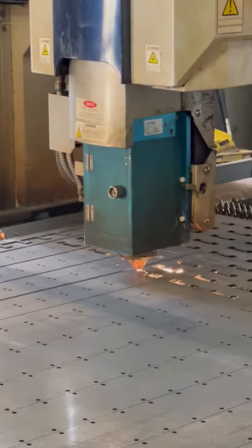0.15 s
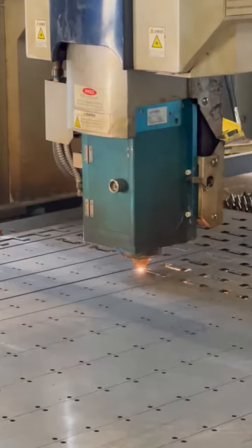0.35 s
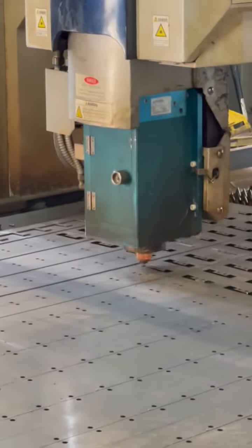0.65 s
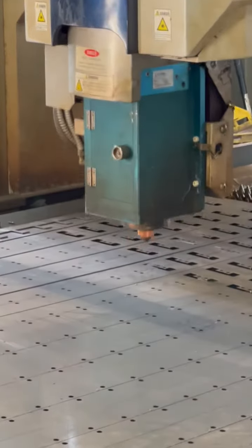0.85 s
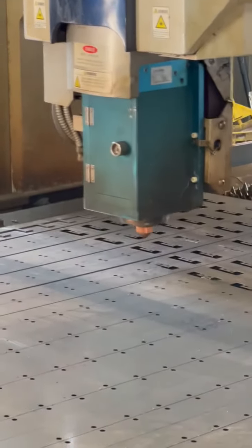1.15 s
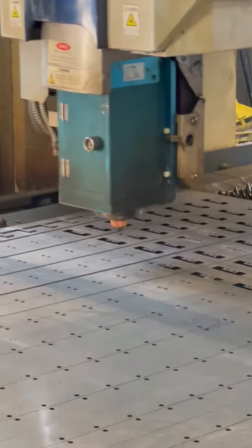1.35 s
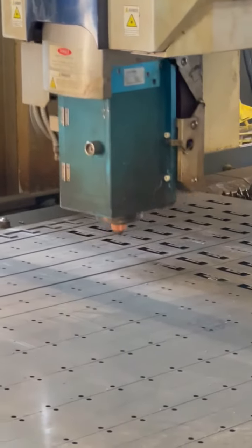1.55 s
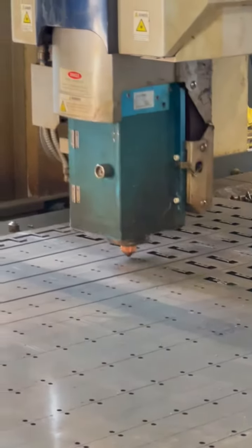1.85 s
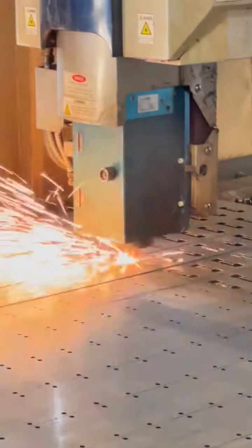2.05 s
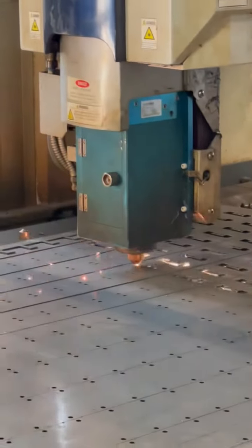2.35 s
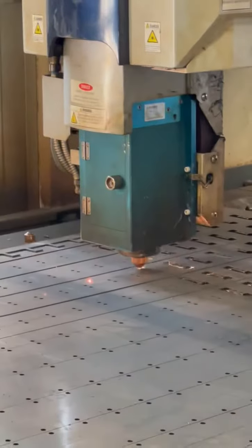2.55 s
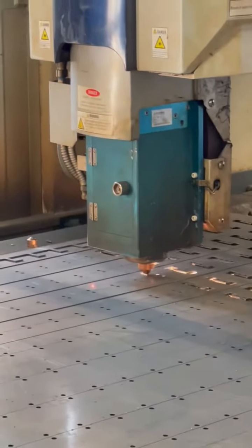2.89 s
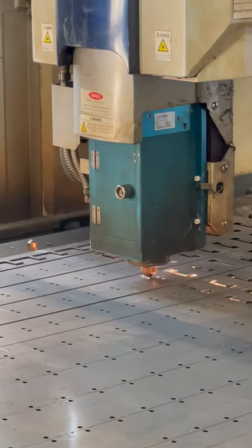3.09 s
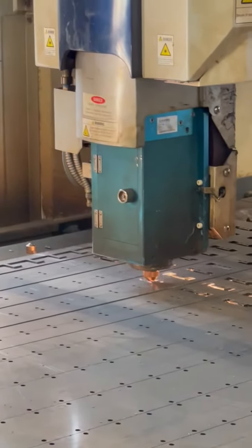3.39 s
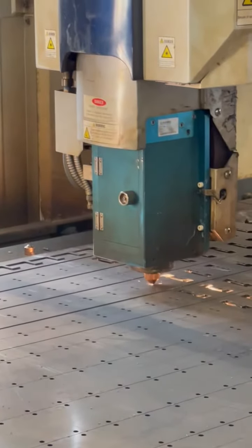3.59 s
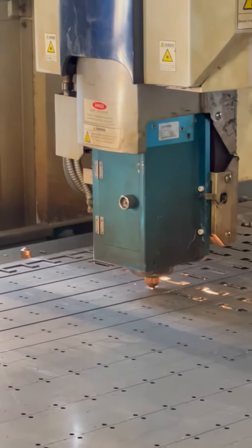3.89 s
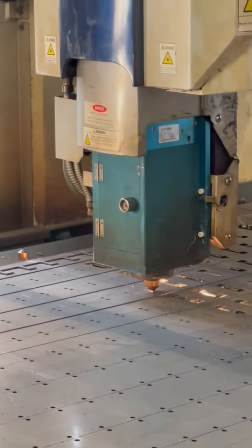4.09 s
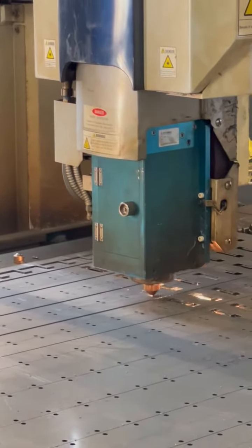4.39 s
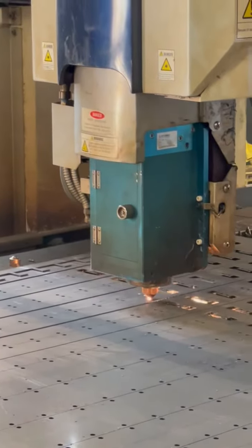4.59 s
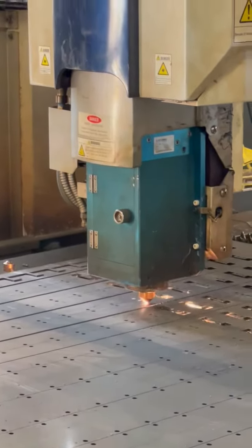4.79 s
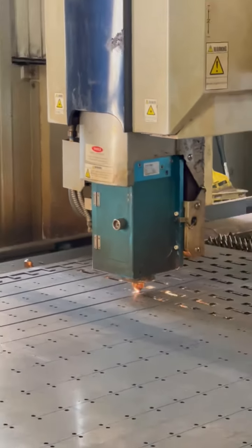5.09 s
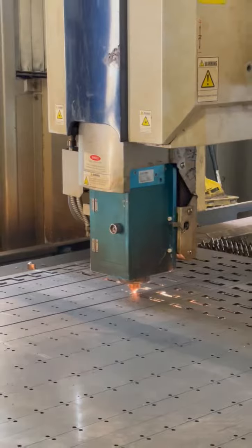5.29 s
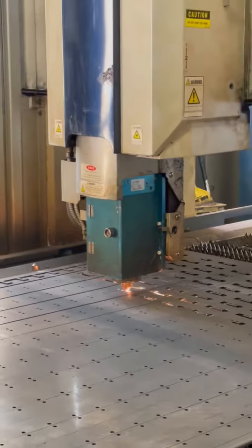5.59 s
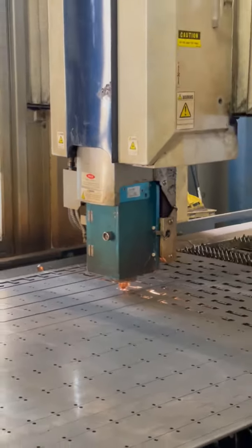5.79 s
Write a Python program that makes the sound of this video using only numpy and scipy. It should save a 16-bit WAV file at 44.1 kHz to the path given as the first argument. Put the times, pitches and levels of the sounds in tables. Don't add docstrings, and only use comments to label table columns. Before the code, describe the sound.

A laser head cuts sheet steel: thin treble hiss over a heavy low machine drone. The hiss stops early with small spits, returns in short puffs, then snaps back in a crackling pierce near two seconds. A streaky whistle joins the cut until a hard compressed-air blast past the middle; afterwards the hiss continues, faltering slightly. Phone microphone close to the machine in a big hall.

```python
import sys
import numpy as np
from scipy import signal
from scipy.io import wavfile
from scipy.ndimage import uniform_filter1d, minimum_filter1d

SR = 44100
rng = np.random.default_rng(int(sys.argv[2]) if len(sys.argv) > 2 else 0)


def gain_from_db(level_db):
    decades = np.asarray(level_db, float) / 20
    return 10 ** decades


def waveform_to_disk(signal):
    frames = np.transpose(np.atleast_2d(signal))
    scaled = np.clip(frames, -1, 1) * 32767
    samples = np.round(scaled).astype(np.int16)
    wavfile.write(sys.argv[1], SR, samples)


N = 261954
TIME_S = np.arange(N) / SR


def evened(x):
    return x / np.sqrt(np.mean(x ** 2) + 1e-20)


def read(points, hz):
    table_hz, value = np.transpose(points)
    return np.interp(np.log(hz + 1), np.log(table_hz + 1), value)


def wander(rate_hz, t):
    rates = np.geomspace(rate_hz / 20, rate_hz, 24)
    return evened(sum(np.sin(2 * np.pi * (f * t + rng.random())) / np.sqrt(f) for f in rates))


def gate(on, off, rise, fall):
    return np.clip((TIME_S - on) / rise, 0, 1) * np.clip(1 - (TIME_S - off) / fall, 0, 1)


def beat(db, loudest_s, period_s, share):
    return gain_from_db(db) * abs(1 + share * np.exp(2j * np.pi * (TIME_S - loudest_s) / period_s))


# pitch_hz, likeness (0-1), left_lead (turns), left_over_right_db
PORT_PAIR = [(115, 1, 0, 0), (140, .995, 0, .9), (330, .95, 0, 1.2), (550, .82, -.02, 3.4),
             (800, .68, -.03, 2.6), (1200, .62, -.03, 2.4), (1650, .7, -.04, 2), (2150, .985, 0, 0),
             (3900, .975, .01, 0), (4500, .93, .08, 0), (4900, .8, .27, 0), (5050, .5, .1, 0),
             (5200, .995, 0, 0), (6000, .99, .02, 0), (6400, .85, .14, 0), (7500, .75, .28, 0),
             (8300, .87, .42, 0), (8800, .96, .47, 0), (9400, .993, .5, 0), (11300, .985, .505, 0),
             (12100, .9, .58, 0), (13300, .7, .83, 0), (14000, .93, .96, 0), (14700, .995, 1, 0)]


def ports(hz):
    table_hz, likeness, lead, tilt_db = np.transpose(PORT_PAIR)
    left = gain_from_db(np.interp(hz, table_hz, tilt_db) / 2) * np.exp(1j * np.pi * np.interp(hz, table_hz, lead))
    return np.interp(hz, table_hz, likeness), np.array([left, 1 / left])


def noise(shape_db, size, patchy_db, flicker_db, patch_hz=450, patch_s=0.045):
    hop = size // 4
    hz = np.fft.rfftfreq(size, 1 / SR)
    t = np.arange(N // hop + 5) * hop / SR
    a, b, c, d, patches = rng.standard_normal((len(t), len(hz), 5)).T
    patches = uniform_filter1d(patches, int(patch_hz / hz[1]) + 1, axis=0)
    patches = uniform_filter1d(patches, int(patch_s / t[1]) + 1, axis=1)
    likeness, gain = ports(hz)
    common = np.sqrt(1 + likeness)[:, None] * (a + 1j * b)
    apart = np.sqrt(1 - likeness)[:, None] * (c + 1j * d)
    level = gain_from_db(shape_db(hz[:, None], t) + patchy_db * evened(patches) + flicker_db * wander(40, t))
    apart = apart * gain_from_db(3.6 * evened(patches[:, ::-1]) - 1.3)
    bins = np.array([common + apart, common - apart]) * gain[:, :, None] * level
    return signal.istft(bins, nperseg=size, noverlap=size - hop)[1][:, :N]


def tones(lines, drift, waver_db):
    coarse_s = np.arange(0, N, 100) / SR
    out = np.zeros((2, N))
    for hz, db in lines:
        slip = np.interp(TIME_S, coarse_s, wander(8, coarse_s))
        swell = np.interp(TIME_S, coarse_s, wander(8, coarse_s))
        turns = np.cumsum(hz * (1 + drift * slip)) / SR + rng.random()
        at_ports = ports(hz)[1][:, None] * np.exp(2j * np.pi * turns)
        out += np.sqrt(2) * gain_from_db(db + waver_db * swell) * at_ports.real
    return out


# pitch_hz, level_db (per Hz)
HALL_ROAR = [(13, -47), (22, -23), (65, -11), (119, -8), (173, -6.5), (193, -12), (221, -10.5), (329, -10),
             (459, -15.5), (512, -14), (668, -18), (974, -17.5), (1450, -23.5), (1850, -23), (4400, -36),
             (5720, -38), (9680, -120)]


def hall_roar():
    shape = lambda hz, t: read(HALL_ROAR, hz) - 40 * np.clip(hz / 4400 - 1, 0, 2)
    return gain_from_db(-21) * evened(noise(shape, size=4096, patchy_db=0.3, flicker_db=-0.34))


# pitch_hz, level_db (per Hz)
FAR_AIR = [(1800, -14), (2600, -8), (4000, -1), (4900, -3.5), (5600, -2.5), (8000, -4.5), (10000, -5),
           (11200, -8.5), (12400, -12.5), (13500, -10.5), (14700, -6), (15800, -8)]


def far_air():
    shape = lambda hz, t: read(FAR_AIR, hz) - 30 * (hz < 2000)
    return gain_from_db(-37.5) * evened(noise(shape, size=512, patchy_db=2.0, flicker_db=0.1))


# pitch_hz, level_db
BLOWER_TONES = [(171.3, -1), (342.4, -16), (513.8, -15)]
# start_s, level_db
BLOWER_LOAD = [
    (0, -40),
    (.25, -27.5),
    (.9, -23.5),
    (1.1, -20),
    (3.55, -21),
    (4.0, -27.5),
    (5.5, -27.5),
    (5.94, -37),
]
# pitch_hz, level_db
PUMP_TONE = [(58.25, -0.5)]
# pitch_hz, level_db
FAN_TONE = [(584.2, 1)]
# pitch_hz, level_db
MOTOR_TONES = [(959, -42), (1678, -51), (2037, -50), (2396, -53), (5443, -56), (5604, -57), (7978, -54),
               (8382, -57)]
# pitch_hz, level_db
NEIGHBOUR_TONES = [(63.86, -38), (64.14, -37), (49, -41), (91.2, -34.5), (168.0, -41), (173.7, -38),
                   (177.8, -41)]


def machines():
    load_s, load_db = np.transpose(BLOWER_LOAD)
    blower = gain_from_db(np.interp(TIME_S, load_s, load_db)) * tones(BLOWER_TONES, 0.0013, 0.7)
    pumps = beat(-27, loudest_s=3.5, period_s=4, share=0.4) * tones(PUMP_TONE, 0.00082, 1.0)
    fans = beat(-40, loudest_s=3, period_s=2.5, share=0.89) * tones(FAN_TONE, 0.00085, 0.94)
    return blower + pumps + fans + tones(NEIGHBOUR_TONES, 0.0042, 2.5) + tones(MOTOR_TONES, 0.00054, 2.3)


# pitch_hz, level_db (per Hz)
VALVE_BLAST = [(800, -14), (2000, -8.5), (3300, -9.5), (4100, -5), (4700, -7), (5500, 2), (6100, -2.5),
               (8000, 1.5), (9300, -1), (10300, -3), (12500, -5), (14500, 1.5), (15800, -1)]
# pitch_hz, t60_s
VALVE_FADING = [(1000, 0.24), (2500, 0.69), (4100, 24), (5000, 2.2), (5600, 1.3), (7000, 1.7),
                (10000, 0.92), (12000, .75), (15000, 0.4)]


def valve():
    start_s, hold_s = 3.593, 0.016

    def fading(hz, t):
        faded_db = 60 * np.maximum(t - start_s - .012, 0) / read(VALVE_FADING, hz)
        return read(VALVE_BLAST, hz) - faded_db - 30 * (hz < 500)

    blast = noise(fading, size=256, patchy_db=1.8, flicker_db=.3, patch_s=.03)
    since = TIME_S - start_s
    late = np.maximum(since - hold_s, 0)
    flow = np.clip(since / 0.002, 0, 1) * gain_from_db(-7.5 - 22 * late - 60 * late ** 2)
    return flow * blast / np.std(blast[:, :round(start_s * SR)])


# pitch_hz, level_db (per Hz)
SPRAY = [(1500, -15), (3000, -7), (6000, -10), (8000, -7), (9000, -3), (10500, -8), (12500, -6), (14300, 0),
         (15800, -1)]
# start_s, peak_db, rise_s, t60_s
SPIT_GUSTS = [
    (.3718, -23, .0012, .12),
    (.4688, -28, .0012, .15),
    (1.978, -19, .0004, .025),
    (1.979, -17.5, .001, .09),
    (1.997, -19, .004, .2),
    (2.0155, -17.5, .0012, .2),
    (2.0742, -20, .0012, .14),
    (2.2418, -26, .0012, .13),
    (3.5249, -29, .0012, .12),
]


def spits():
    shape = lambda hz, t: read(SPRAY, hz) - 30 * (hz < 1000)
    spray = noise(shape, size=256, patchy_db=1.5, flicker_db=.3)
    gusts = np.zeros(N)
    for s, db, rise, t60 in SPIT_GUSTS:
        gusts += gain_from_db(db - 60 * abs(TIME_S - s) / t60) * np.clip((TIME_S - s) / rise, 0, 1)
    return gain_from_db(-3.5) * gusts * evened(spray)


# start_s, end_s, level_db, pitch_hz
SLOT_WHISTLES = [
    (0, 0.393, -47, 5930),
    (2.1, 2.62, -47, 6160),
    (2.62, 3.598, -38.5, 6180),
    (3.603, 4.8, -43.5, 6500),
]


def whistle():
    cross_s = 0.11
    slots = [gain_from_db(db) * gate(on - cross_s / 2, off - cross_s / 2, cross_s, cross_s)
             for on, off, db, hz in SLOT_WHISTLES]
    slots = np.array(slots) + 1e-5
    strength = slots.sum(axis=0)
    centre_hz = np.array(SLOT_WHISTLES)[:, -1] @ slots / strength

    def band(hz, t):
        centre = np.interp(t * SR, np.arange(N), centre_hz)
        return -11.5 * np.log10(1 + ((hz - centre) / 680) ** 4)

    return strength * evened(noise(band, size=1024, patchy_db=3.0, flicker_db=.5, patch_hz=90, patch_s=.3))


# pitch_hz, level_db (per Hz)
JET_HISS = [(2000, -15), (4000, -6), (6000, -6), (8000, -3.5), (10500, -3), (12500, -7), (13600, -5.5),
            (14700, -.5), (15800, -2)]
# pitch_hz, level_db
NOZZLE_TONES = [(14680, -14), (15138, -15)]
# start_s, end_s, rise_s, fall_s, level_db
GAS_FLOW = [
    (0, .4, .02, .04, -39.5),
    (.38, 0.66, .02, .04, -47),
    (.58, 0.77, 0.1, .04, -38.5),
    (1.6, 1.73, .1, .03, -44),
    (1.98, 3.7, .02, .1, -39.5),
    (3.7, 6, .1, .02, -41.5),
]
# start_s, dip_db
CORNER_DIPS = [
    (2.268, -12),
    (2.575, -5),
    (3.512, -6.5),
    (4.53, -10),
    (5.162, -5),
    (5.63, -5),
    (5.708, -8),
]


def jet():
    idle_db, corner_s = -59, 0.013
    flow = gain_from_db(idle_db) + sum(gain_from_db(db) * gate(*times) for *times, db in GAS_FLOW)
    dips_db = sum(db * np.exp(-((TIME_S - s) / corner_s) ** 2) for s, db in CORNER_DIPS)
    shape = lambda hz, t: read(JET_HISS, hz) - 30 * (hz < 1500)
    hiss = noise(shape, size=256, patchy_db=1.8, flicker_db=.7)
    return flow * gain_from_db(dips_db) * (gain_from_db(5.0) * evened(hiss) + tones(NOZZLE_TONES, 0.00057, 3.0))


def scene():
    return hall_roar() + far_air() + machines() + valve() + spits() + whistle() + jet()


def top_cut(x):
    return signal.sosfilt(signal.butter(12, 17000, fs=SR, output="sos"), x)


def record(dry):
    ceiling, edge_hz = .9, 15830
    treble = signal.sosfilt(signal.butter(2, 3000, "high", fs=SR, output="sos"), dry)
    power = signal.lfilter([.002], [1, -.998], (treble ** 2).mean(0))
    power_db = 10 * np.log10(power + 1e-12)
    over_db = 6.24 * np.clip((power_db + 15.5) / 2, 0, 1)
    hold = round(.16 * SR)
    held_db = -minimum_filter1d(-np.pad(over_db, (hold // 2, 0)), size=hold)[:N]
    fall = np.arange(N) * 40.0 / SR
    held_db = np.maximum.accumulate(held_db + fall) - fall
    ducked = dry / gain_from_db(signal.lfilter([.0012], [1, -.9988], held_db))
    softened = ceiling * np.tanh(ducked / ceiling)
    limited = signal.oaconvolve(softened, signal.firwin(511, edge_hz, fs=SR)[None], "same")
    return top_cut(limited)


dry = scene()
out = record(dry)
waveform_to_disk(out)
```